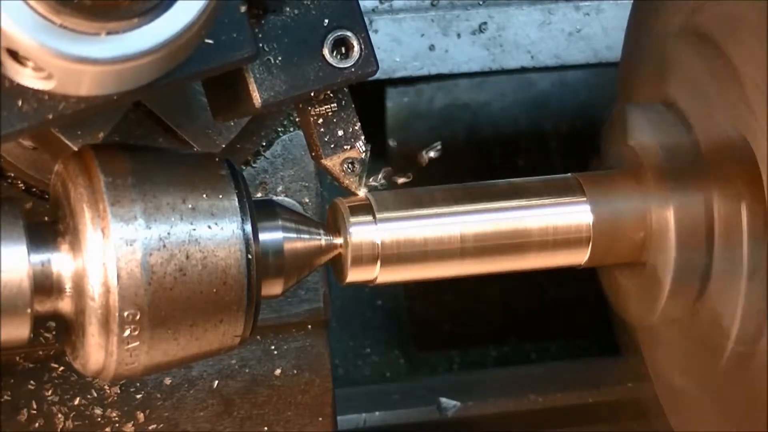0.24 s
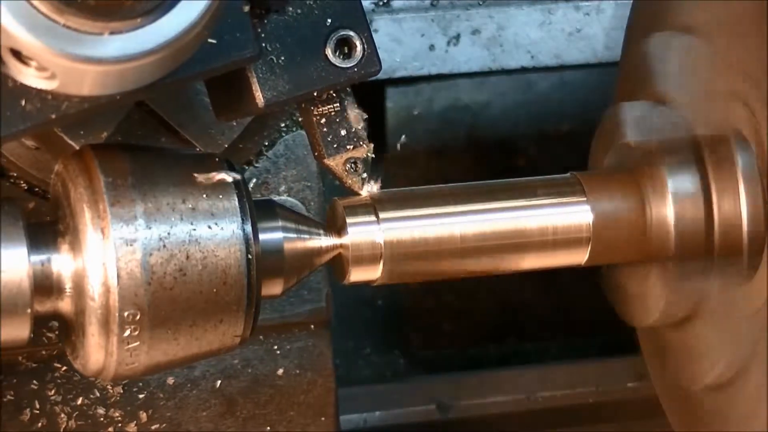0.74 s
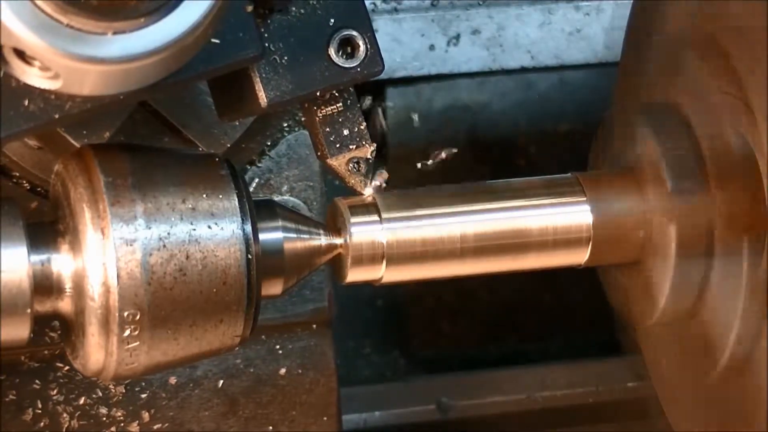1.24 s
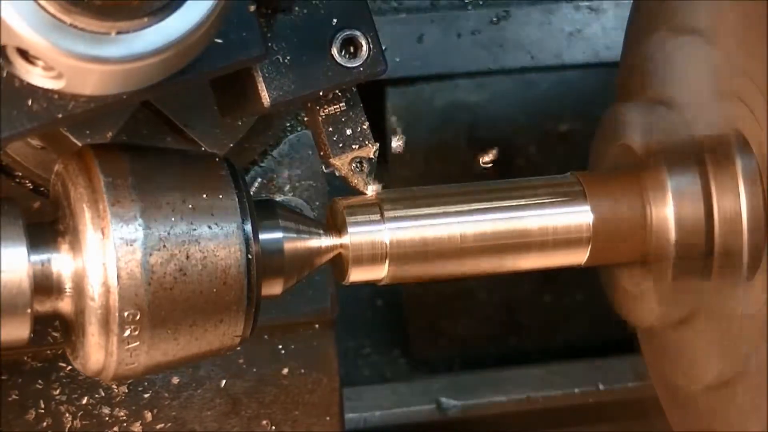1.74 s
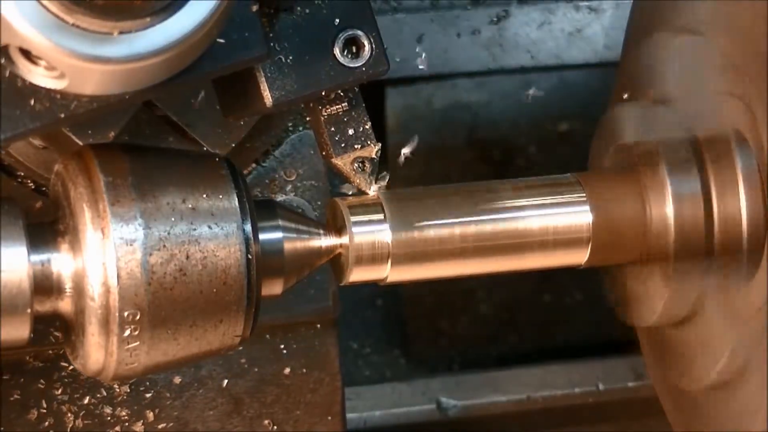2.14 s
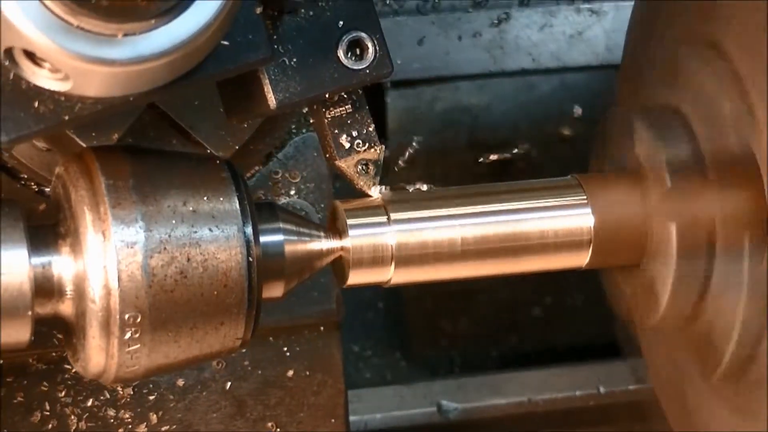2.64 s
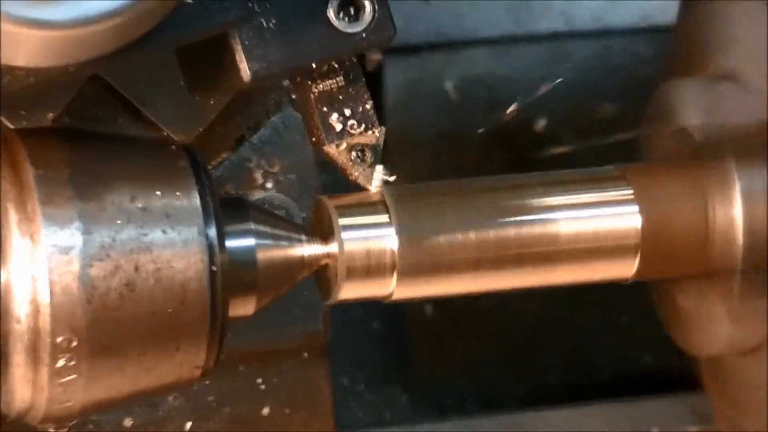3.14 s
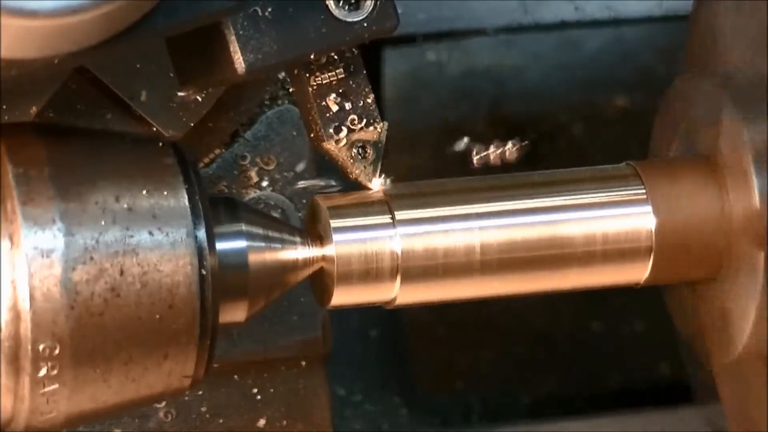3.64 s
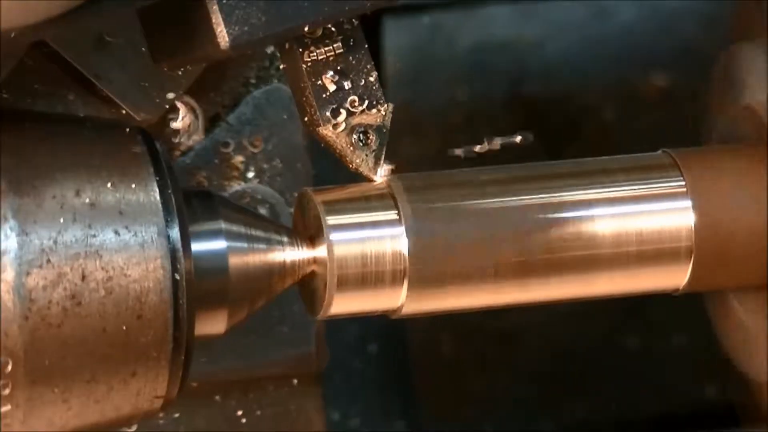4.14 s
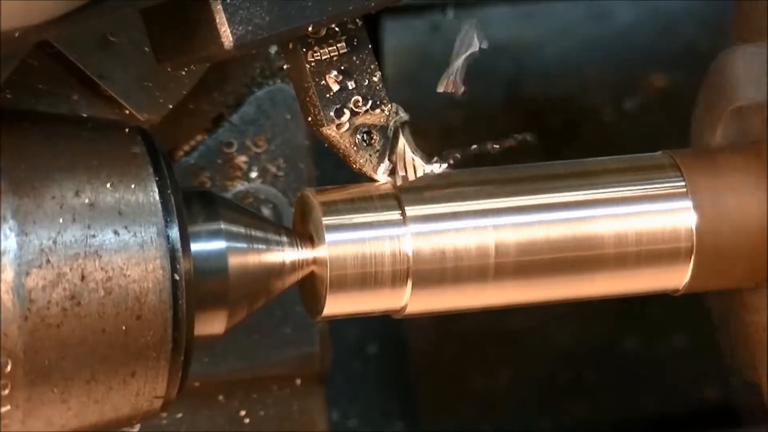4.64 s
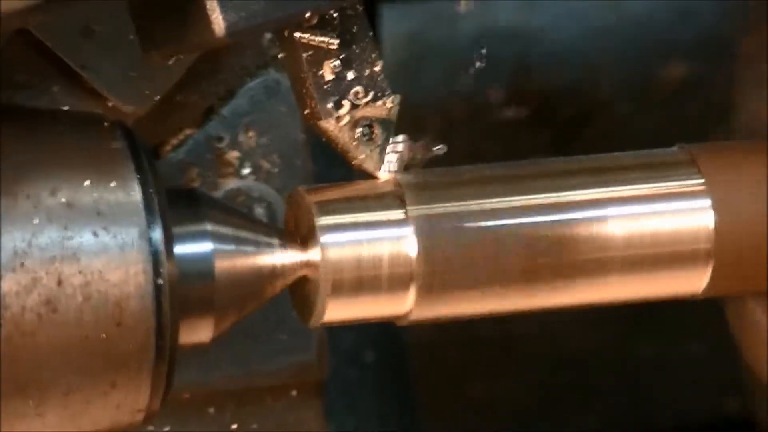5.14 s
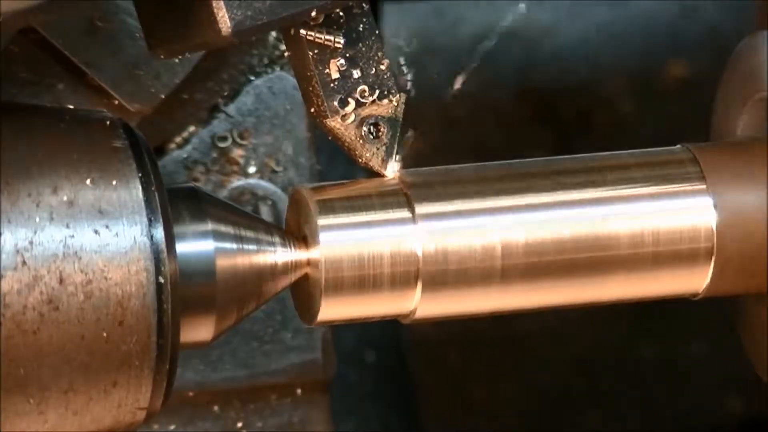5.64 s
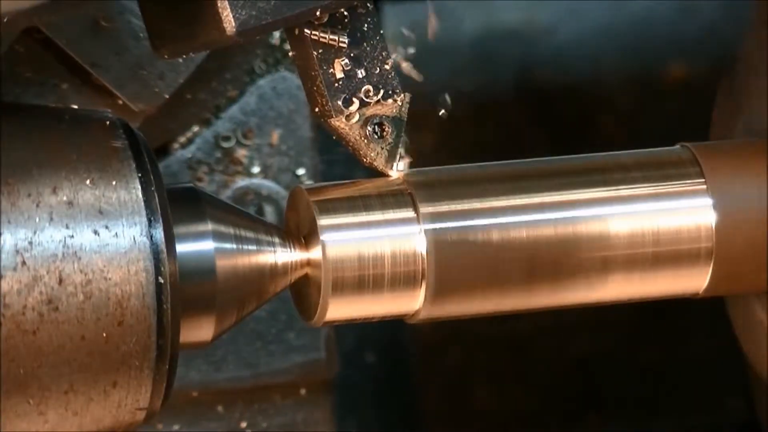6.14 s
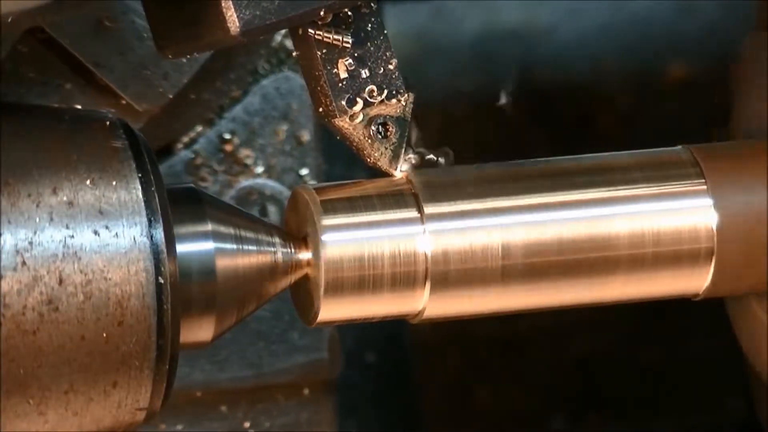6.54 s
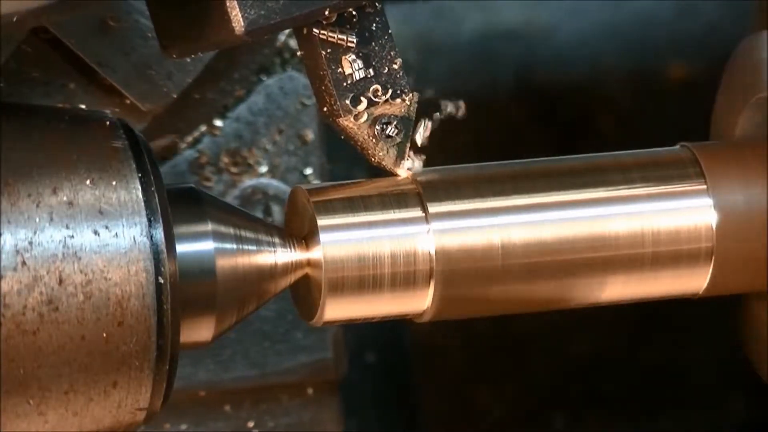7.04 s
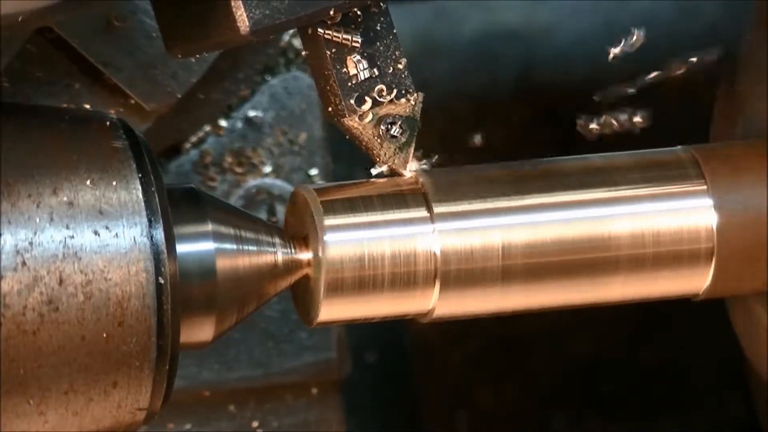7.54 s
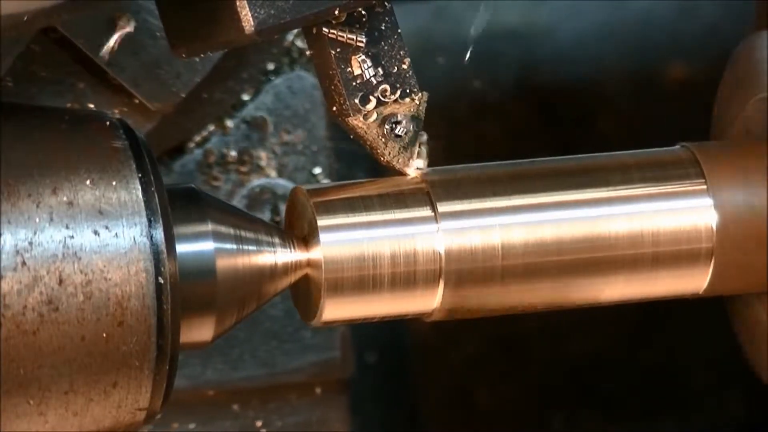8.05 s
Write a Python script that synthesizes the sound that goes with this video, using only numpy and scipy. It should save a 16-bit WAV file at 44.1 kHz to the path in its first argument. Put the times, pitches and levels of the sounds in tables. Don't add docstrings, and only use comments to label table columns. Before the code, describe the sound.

From 0 s a geared lathe is already at full speed, heard very close on a small handheld stereo microphone in a workshop. A bright, gritty rasp of shearing metal dominates and stays almost level, fluttering about eleven times a second with the rotation. Underneath are mains hum and a steady whine of gear tones. Metallic squeals, mid-high to piercing, flicker in bursts of hundredths of a second throughout. A loose jaw knocks softly every turn, sometimes hard, especially from 2 to 5.7 s. Chips tick, spit and snap; the sharpest cracks hit at about 2.2, 2.4 and 2.6 s. Low handling thumps come around 2.4, 3.2, 3.9 and 5.05 s, the last strongest. From 4 to 6 s chip strikes are sparser while cutting continues. Ticks gather again after 6.5 s, with a hard crack near 8.15 s, and the cut is still running at the end, around 8.4 s.

```python
import sys
import numpy as np
from scipy import signal
from scipy.fft import rfft, irfft
from scipy.io import wavfile
from scipy.ndimage import uniform_filter1d

SR = 44100
rng = np.random.default_rng(int(sys.argv[2]) if len(sys.argv) > 2 else 0)


def level_to_linear(level):
    exponent = np.asarray(level, float) / 20
    return 10 ** exponent


def transcribe(signal):
    frames = np.atleast_2d(signal).T
    limited = np.clip(frames, -1, 1)
    pcm = np.round(limited * 32767).astype(np.int16)
    wavfile.write(sys.argv[1], SR, pcm)


N = 365148
T = np.arange(N) / SR
SPINDLE_HZ = 10.944
COUNTERSHAFT_HZ = .4 * SPINDLE_HZ

HUM_DB = [-59, -49, -60]
# [t/s, main gear mesh level/dB, fourth hum multiple level/dB]
DRIVE_LOAD = [(0.0, -40, -44), (0.3, -37, -34.5), (1.2, -36.5, -40), (2.1, -36, -36), (2.6, -37.5, -39),
              (3.0, -36, -37), (4, -37, -37), (5.1, -37, -35.5), (5.8, -35.5, -36), (7.1, -35.7, -40),
              (7.45, -38, -40.5), (8.12, -33.5, -39), (8.28, -38, -41)]
# [multiple of spindle speed, level/dB rms]
GEAR_TONES = [(25, -54), (30, -52), (31, -53), (33, -55), (37, -57), (38, -54), (40, -59), (48, -52),
              (54, -54), (56, -56), (59, -53), (60, -49), (67, -49), (83, -42.5), (90, -41), (91, -42),
              (92, -44), (101, -46), (102, -41), (103, -44), (104, -45), (105, -44), (106, -44), (119, -46),
              (120, -38), (125, -47), (127, -45), (138, -42), (150, -45)]
# [t/s, peak level/dB, f/Hz, t60/s]
HAND_BUMPS = [(2.27, -40, 108, .12), (2.3, -44, 120, .12), (2.409, -32, 120, 0.13), (2.88, -32, 170, .1),
              (3.172, -18, 120, 0.053), (3.2, -29, 115, .16), (3.445, -38, 60, .12), (3.59, -46, 60, .1),
              (4.21, -43, 70, .1), (4.37, -46, 60, .1), (3.88, -45, 130, 0.062), (3.911, -31, 100, 0.09),
              (5.054, -13, 120, 0.043), (5.09, -36, 70, .13)]
# [t/s, rumble level/dB]
GRIP = [
    (0.0, -60),
    (2.1, -59),
    (2.35, -50),
    (2.6, -53),
    (3.05, -57),
    (3.22, -50),
    (3.35, -57),
    (4.05, -57),
    (4.3, -54),
    (8.28, -60),
]
# [t/s, peak level/dB, f/Hz]
JAW_KNOCKS = [(0.2793, -20, 2260), (0.7287, -20, 2330), (0.8255, -21, 2330), (1.0935, -20, 2300),
              (1.4576, -20, 2280), (1.5489, -14, 2200), (2.0996, -13, 2310), (2.1884, -28, 2200),
              (2.2812, -16, 2160), (2.3795, -14, 2180), (2.5626, -15.5, 2180), (2.7362, -20, 2270),
              (2.8285, -13, 2220), (2.9223, -12, 2220), (3.0111, -14, 2250), (3.1946, -19, 2290),
              (3.927, -12, 2340), (4.0143, -13, 2200), (4.1126, -17, 2220), (4.2916, -14, 2130),
              (4.3813, -12, 2260), (4.4727, -18, 2350), (5.023, -12, 2230), (5.2051, -15.5, 2140),
              (5.2979, -18, 2270), (5.474, -12, 2220), (5.6615, -15, 2260), (6.3914, -15, 2250),
              (8.0381, -23, 2210), (8.2187, -15, 2100)]
# [t/s, tick peak level/dB, clack level above the tick/dB, before the clack trim]
CHIP_HITS = [(0.0687, -22.5, 4), (0.3301, -26, 5), (0.7277, -23, 4), (0.9118, -25, 5), (1.4795, -20, 5),
             (2.0083, -27, 4), (2.0224, -17, 2), (2.2837, -21, 7), (2.2962, -26, 4), (2.372, -23, 2),
             (2.3865, -16, 2), (2.4154, -20, 0), (2.5576, -18, 3), (2.6594, -25, -6), (2.7187, -19, 6),
             (3.1093, -22, 7), (3.2056, -26, 5), (3.2824, -17, 7), (3.9285, -23, 7), (6.5041, -27, 7),
             (7.1477, -30.5, 5), (7.4924, -26, 0), (7.5113, -24, 1), (7.6929, -20, -0.5), (7.7638, -24, 4),
             (8.0556, -21, 3), (8.1294, -24, 4), (8.1464, -21, 3)]
# [t/s, peak level/dB]
GUARD_HITS = [
    (2.1905, -9),
    (2.4154, -6.5),
    (2.5755, -8),
    (8.1464, -9),
]
# [t/s, peak level/dB]
SCRAPES = [(0.5048, -32), (1.0051, -33), (1.036, -32), (1.3234, -31), (1.5339, -30), (1.7374, -27),
           (1.9629, -31), (2.0063, -29), (2.1415, -32), (2.382, -26), (2.5586, -28), (2.6594, -30),
           (2.7342, -31), (2.9218, -23), (3.0609, -31), (3.1916, -29), (3.2854, -28), (3.3772, -28),
           (3.5573, -29), (3.5633, -27), (3.7399, -27), (3.7813, -30), (3.9285, -27), (4.0108, -29),
           (4.0741, -30), (4.1116, -29), (4.2053, -28), (4.4313, -32), (4.4697, -31), (4.6478, -31),
           (6.113, -31), (6.2627, -29), (6.3006, -33), (6.5181, -29), (6.7506, -30), (6.8204, -31),
           (6.8488, -29), (6.9366, -29), (7.0289, -32), (7.4934, -28), (7.7643, -28), (7.8575, -32),
           (8.1279, -29)]
# [t/s, peak level/dB]
CHIP_BREAKS = [(0.5646, 0), (0.6485, -5), (0.7282, -9), (0.8255, -6), (1.5304, -8), (1.6087, -7),
               (2.0996, -6), (2.1885, -1), (2.2812, -5), (2.3775, -3), (2.4149, 1), (2.4723, -7),
               (2.6469, -12), (3.021, -3), (3.0689, -6), (3.1955, -9), (3.2804, -6), (3.5808, -9),
               (4.2916, -6), (4.4897, -9), (5.1731, -7), (5.2051, -9), (5.5872, -9), (5.8396, -6),
               (6.1285, -8), (6.3006, -6), (6.4408, -9), (6.5016, -7), (6.5385, -8), (6.6483, -7),
               (6.9072, -8), (7.3253, -7), (7.4155, -8), (7.855, -7), (7.873, -6), (8.0386, -6),
               (8.1464, -5)]
# [f/Hz, width/Hz, steadiness 0-1]
SQUEAL_MODES = [
    (4618, 100, .4),
    (6154, 24, .9),
    (9490, 50, .5),
    (2880, 90, .5),
]
SQUEAL_DB = [-28.5, -33.5, -48, -37]
# [multiple of the countershaft, depth/dB, when/beats]
SQUEAL_BEATS = [
    [(1, 0.95, 0.52), (2.5, 0.37, 0.47), (5, 0.34, 0.52)],
    [(1, 4.1, 0.95), (2, 2, 0.59), (2.5, 1.1, 0.04), (4, 2.6, 0.05), (5, 1, 0.07), (6, 1.3, 0.1)],
    [(1, 2, 0.66), (2.5, 1.8, 0.2), (5, 1.5, 0.1)],
    [(2.5, 1.2, .03)],
]
# [t/s, peak level/dB]
SHANK_BURSTS = [(0.009, -21), (0.039, -24), (0.124, -24), (0.311, -17.5), (0.567, -19.1), (0.648, -27),
                (0.877, -21), (1.028, -22.1), (1.219, -22.4), (1.29, -19), (1.327, -23), (1.457, -19),
                (1.491, -19.5), (1.7, -21), (1.751, -21.7), (1.931, -24), (1.978, -24), (2.124, -22.2),
                (2.193, -19), (2.253, -24), (2.404, -22.0), (2.759, -23), (3.07, -21.4), (3.211, -24),
                (3.282, -19), (3.585, -23), (3.667, -22.0), (3.765, -25), (3.946, -22.3), (4.049, -24),
                (4.308, -21), (4.401, -26), (4.493, -20.0), (4.879, -20), (4.91, -24), (5.133, -29),
                (5.178, -23), (5.415, -24), (5.496, -23), (5.589, -28), (5.77, -22), (5.848, -20.2),
                (6.132, -18.8), (6.317, -21.8), (6.507, -25.5), (6.56, -21), (6.687, -24), (6.731, -22),
                (6.911, -20), (7.327, -20), (7.418, -18.2), (7.451, -30), (7.612, -21), (7.697, -20),
                (7.783, -22), (7.877, -17), (7.92, -22.5), (8.14, -20), (8.175, -20.0), (8.235, -21.8)]
# [t/s, peak level/dB, length/s]
TIP_BURSTS = [(0.218, -26.7, 0.029), (0.397, -25.0, 0.016), (0.459, -26.4, 0.014), (0.523, -25.7, 0.02),
              (0.631, -26.3, 0.021), (0.684, -24.1, 0.015), (0.742, -22.4, 0.027), (1.312, -26.5, 0.015),
              (1.401, -26.5, 0.009), (1.648, -24.0, 0.012), (1.772, -24.5, 0.026), (1.826, -23.4, 0.013),
              (1.997, -25.4, 0.031), (2.054, -24.9, 0.017), (2.222, -23.5, 0.026), (2.286, -26.8, 0.012),
              (2.346, -26.3, 0.014), (2.556, -25.9, 0.032), (2.735, -25.1, 0.02), (2.958, -26.6, 0.016),
              (3.249, -27.6, 0.027), (3.432, -23.8, 0.015), (3.49, -25.6, 0.013), (3.65, -26.4, 0.019),
              (3.837, -23.9, 0.019), (3.935, -24.6, 0.013), (4.038, -27.5, 0.012), (4.115, -27.3, 0.017),
              (4.154, -23.9, 0.024), (4.284, -26.2, 0.02), (4.389, -24.1, 0.01), (4.524, -24.3, 0.014),
              (4.565, -23.6, 0.02), (4.754, -23.9, 0.013), (4.8, -25.3, 0.018), (4.837, -27.0, 0.035),
              (4.96, -24.6, 0.022), (5.024, -22.9, 0.016), (5.073, -21.7, 0.012), (5.213, -26.4, 0.045),
              (5.477, -25.0, 0.02), (5.878, -27.2, 0.012), (5.943, -23.8, 0.021), (5.99, -24.7, 0.015),
              (6.114, -25.5, 0.039), (6.171, -24.0, 0.011), (6.384, -24.6, 0.022), (6.57, -26.8, 0.019),
              (6.787, -24.1, 0.037), (7.03, -22.9, 0.014), (7.134, -21.5, 0.013), (7.251, -27.4, 0.035),
              (7.297, -24.0, 0.016), (7.496, -25.3, 0.022), (7.579, -26.9, 0.034), (7.692, -25.1, 0.012),
              (7.762, -26.1, 0.021), (7.836, -24.4, 0.019), (7.962, -24.1, 0.02), (8.221, -22.3, 0.02)]
# [t/s, peak level/dB]
INSERT_BURSTS = [(0.147, -44.2), (0.434, -43), (1.058, -41.6), (1.344, -42), (1.976, -43.5), (2.145, -43),
                 (2.387, -46), (3.071, -43), (3.14, -41), (3.295, -40), (3.527, -45.1), (3.801, -41),
                 (4.028, -41), (4.213, -38), (4.495, -42.6), (4.931, -40), (5.213, -45.4), (5.428, -45.1),
                 (6.134, -45.3), (6.266, -41.7), (6.523, -37), (6.77, -42.7), (7.037, -46), (7.231, -44.5),
                 (7.688, -42.9), (8.159, -46)]
# [t/s, peak level/dB]
BAR_BURSTS = [(0.164, -19), (0.386, -19), (0.516, -23.4), (0.785, -30), (0.891, -18), (1.09, -22),
              (1.154, -20), (1.201, -29), (1.317, -25.9), (1.534, -26.1), (1.667, -23), (1.762, -18),
              (3.216, -25.8), (3.312, -25.7), (3.431, -23), (3.667, -22), (3.943, -23), (4.085, -28),
              (4.535, -26.8), (4.896, -24), (5.049, -22), (5.617, -21), (5.72, -26.9), (5.768, -24.7),
              (5.846, -24.6), (5.927, -21), (6.223, -27), (6.436, -26.6), (6.509, -24.4), (6.571, -18),
              (6.613, -22), (6.749, -26.7), (6.866, -24), (6.942, -26.3), (7.269, -19), (7.602, -20),
              (7.694, -29), (7.795, -20), (7.849, -20), (8.194, -23)]
BURST_RISE_S = [0.007, 0.006, .018, .014]
BURST_FALL_S = [0.012, 0.02, 0.02, .016]
BURST_TRIM_DB = [1, 0, 1.5, -4]
# [f/Hz, level/dB per Hz]
RASP_SPECTRUM = [(30, -33), (90, -43), (200, -20), (300, -16.5), (500, -12.5), (800, -3), (1000, -2),
                 (3000, -2), (3400, -4), (6000, -2), (7200, -14.5), (10200, -22.5), (13000, -38),
                 (15000, -35.5), (15700, -49)]
# bed, carriage and bar resonances [f/Hz]
BODY_HZ = [265, 345, 410, 510, 660, 905, 1005, 1135, 1203, 1300, 1480, 1565, 1645, 1880, 2097, 2290, 2495,
           2600, 2798, 2900, 3110, 3277, 3607, 3900, 4740, 4960, 5290, 8300, 11150, 12050]
# [width/Hz, level above the rasp/dB]
BODY_SHAPES = [(10, 13.5), (60, 6), (17.6, 4), (60, 7), (60, 2), (13, 7), (70, 4.5), (60, 2.5), (30, 4.5),
               (50, 4), (70, 3.5), (25, 2.5), (50.6, 5.5), (120, 5.5), (40, 5), (80, 3), (20, 5.5), (70, 5),
               (49.3, 4), (88.5, 4.5), (70, 5), (29.6, 7), (49.3, 5), (49, 6), (308, 4), (50, 2.5),
               (21, 6.5), (1170, 6), (494, 6.5), (500, 7)]
# [f/Hz, width/Hz, level/dB]
HOLDER = [(6700, 400, 3), (7230, 200, -3), (7830, 140, -7), (8150, 120, 1.5), (10300, 200, -2),
          (10440, 430, -5), (11300, 100, 2.5), (11600, 200, 4.5), (11900, 150, -8)]
# [f/Hz, swell once a turn/dB, when/turns, swell twice a turn/dB, when/half turns]
RUNOUT = [(566, 0.9, 0.71, 0.5, 0.55), (1010, 1.5, 0.56, 0.9, 0.44), (1549, 0.4, 0.86, 0.1, 0.13),
          (2245, 1.5, 0.02, 1.2, 0.03), (2771, 0.2, 0.24, 0.5, 0.27), (3752, 0.3, 0.24, 0.7, 0.33),
          (4643, 1.0, 0.21, 0.5, 0.34), (5422, 0.5, 0.23, 0.3, 0.19), (6155, 0.8, 0.08, 0.8, 0.07),
          (6641, 0.9, 0.04, 0.7, 0.06), (7937, 0.8, 0.12, 0.3, 0.29), (9498, 0.5, 0.17, 0.6, 0.17),
          (11832, 1.3, 0.06, 0.5, 0.04)]
# [f/Hz, likeness 0-1, left minus right level/dB, left lead/rad]
PORTS = [(100, .35, -4.5, 0), (250, .93, -10.5, .45), (1000, .9, -6.7, .6), (2000, .83, -2.6, .6),
         (4500, .94, 0, .1), (6200, .9, -.5, -.2), (6900, .75, 0, -.5), (7700, .35, -7, -1.2),
         (8300, .42, -12, .5), (9500, .4, -6, .5), (9900, .4, 0, .5), (11300, .72, -.7, 0),
         (12500, .2, -.5, .2), (12900, .22, -.5, 3)]


def evened(x):
    return x / np.sqrt(np.mean(x ** 2) + 1e-20)


def read(points, hz):
    f, *values = np.transpose(points)
    return [np.interp(np.log(hz + 1), np.log(f + 1), v) for v in values]


def follow(rows, t):
    s, *values = np.transpose(rows)
    return [np.interp(t, s, v) for v in values]


def cycle(turns):
    return np.cos(2 * np.pi * turns)


def wander(rate_hz):
    r = np.exp(-2 * np.pi * rate_hz / SR)
    return evened(signal.lfilter([1], [1, -2 * r, r * r], rng.standard_normal(N + SR))[SR:])


def add(mix, s, sound):
    part = mix[..., round(s * SR):][..., :sound.shape[-1]]
    part += sound[..., :part.shape[-1]]


def band(x, lo_hz, hi_hz):
    return signal.sosfilt(signal.butter(3, [lo_hz, hi_hz], "band", fs=SR, output="sos"), x)


def crack(t60):
    burst = rng.standard_normal((2, 600)) * level_to_linear(-60 * np.arange(600) / SR / t60)
    return burst / abs(burst).max(axis=1, keepdims=True)


def burst_shape(rows, rise_s, fall_s):
    out = np.zeros(N)
    for s, db, *length in rows:
        near = slice(max(round((s - .2) * SR), 0), round((s + .2) * SR))
        late = T[near] - s
        after_s = 1.2 * length[0] if length else fall_s
        out[near] += level_to_linear(db) * np.exp(-(late / np.where(late < 0, rise_s, after_s)) ** 2)
    return out


def motor():
    swell_db = follow(DRIVE_LOAD, T)[1] + 0.7 * wander(12.0) + 1.3 * cycle(SPINDLE_HZ * T - .74)
    out = np.zeros(N)
    for k, db in enumerate(HUM_DB + [swell_db]):
        out += level_to_linear(db + 2.5) * np.sin(2 * np.pi * ((k + 1) * 120.02 * T + rng.random()))
    return out


def gears():
    turns = SPINDLE_HZ * T + 0.00054 * wander(2.1)
    drift = [wander(5.7) for _ in range(4)]
    mesh_db = follow(DRIVE_LOAD, T)[0] + 4.5 + 1.2 * cycle(7.4 * T - 0.52)
    out = level_to_linear(mesh_db) * np.sin(2 * np.pi * 24 * turns)
    for k, (multiple, db) in enumerate(GEAR_TONES):
        level = level_to_linear(db + 2.5 + 2.4 * drift[k % 4])
        out += level * np.sin(2 * np.pi * (multiple * turns + rng.random()))
    return out


def handling():
    out, t = np.zeros((2, N)), np.arange(6000) / SR
    trim_db = -7.0
    for s, db, hz, t60 in HAND_BUMPS:
        sag = hz * (t + 0.0041 * (1 - np.exp(-t / 0.0041)))
        level = level_to_linear(db + trim_db - 60 * t / t60) * (1 - np.exp(-t / 0.00085))
        add(out, s, level * np.sin(2 * np.pi * sag) * [[1], [.8]])
    rumble = evened(band(rng.standard_normal((2, N)), 48, 264))
    return out + level_to_linear(follow(GRIP, T)[0] + trim_db + 5 * wander(7.9)) * rumble


def knocks():
    out, t = np.zeros(N), np.arange(1500) / SR
    soft = [(k / SPINDLE_HZ - .004, -26, 2250) for k in range(1, int(N / SR * SPINDLE_HZ))]
    for s, db, hz in soft + JAW_KNOCKS:
        level = level_to_linear(db - 60 * t / .06) * (1 - np.exp(-t / .002))
        add(out, s, level * np.sin(2 * np.pi * hz * t))
    return out


def chips():
    tick, clack = np.zeros((2, N)), np.zeros((2, N))
    scatter = [(s * N / SR, -34 + 3.5 * u ** 2, 4.0) for s, u in rng.random((250, 2))]
    shaken = [(s, db - 13, 4.0) for s, db, _ in JAW_KNOCKS]
    for s, db, clack_db in CHIP_HITS + scatter + shaken:
        burst = level_to_linear(db) * crack(t60=.012)
        add(tick, s, burst)
        add(clack, s, burst * level_to_linear(clack_db - 23))
    for s, db in GUARD_HITS:
        add(clack, s, level_to_linear(db + 8) * crack(t60=.01))
    bright = level_to_linear(6) * band(tick, 6800, 10500)
    airy = level_to_linear(-8) * band(tick, 10500, 13000)
    return bright + airy + band(clack, 1200, 6500)


def spits():
    out = np.zeros((2, N))
    for s, db in SCRAPES:
        add(out, s, level_to_linear(db + 3.5) * crack(t60=.03))
    return band(out, 7500, 13000)


def snaps():
    out = np.zeros((2, N))
    for s, db in CHIP_BREAKS:
        add(out, s, level_to_linear(db - 2) * crack(t60=.02))
    return band(out, 1000, 6500)


def squeals():
    out = np.zeros((2, N))
    for k, rows in enumerate([SHANK_BURSTS, TIP_BURSTS, INSERT_BURSTS, BAR_BURSTS]):
        hz, width, steady = SQUEAL_MODES[k]
        r = np.exp(-np.pi * width / SR)
        noise = rng.standard_normal((2, N, 2)) @ [1, 1j]
        z = signal.lfilter([1], [1, -2 * r ** 1.5, r ** 3], noise)
        z = z / (abs(z) + 1e-9) ** steady
        ring = evened((z * np.exp(2j * np.pi * hz * T)).real)
        beat_db = sum(depth_db * np.cos(2 * np.pi * (m * COUNTERSHAFT_HZ * T - at))
                      for m, depth_db, at in SQUEAL_BEATS[k])
        bursts = level_to_linear(BURST_TRIM_DB[k]) * burst_shape(rows, BURST_RISE_S[k], BURST_FALL_S[k])
        out += np.hypot(level_to_linear(SQUEAL_DB[k] + beat_db), bursts) * ring
    return out


def rasp_motion(t, hz):
    frames, pitch = len(t), hz[:, None]
    once_db, once_at, twice_db, twice_at = (v[:, None] for v in read(RUNOUT, hz))
    turn = SPINDLE_HZ * t
    swell_db = once_db * cycle(turn - once_at) + twice_db * cycle(2 * turn - twice_at)
    patches = uniform_filter1d(rng.standard_normal((len(hz), frames)), size=5, axis=0)
    patches = evened(uniform_filter1d(patches, size=30, axis=1))
    flicker = evened(uniform_filter1d(rng.standard_normal(frames), size=8))
    field_db = 0.81 * swell_db + 0.37 * patches + 1.14 * np.clip(pitch / 9000, 0, 1) * flicker
    crackle = evened(uniform_filter1d(rng.exponential(1, frames) ** 2, size=3) - 2)
    field_db += .7 * np.clip(pitch / 3000, 0, 1.4) * np.minimum(crackle, 4)
    bar_db = 1.5 * cycle(0.364 * t - 0.31) + 1.5 * np.interp(t, T, wander(3.9))
    return field_db + 0.73 * np.exp(-((pitch - 2850) / 220) ** 2) * (bar_db - bar_db.mean())


def rasp():
    hop, size = 64, 256
    hz = np.fft.rfftfreq(size, 1 / SR)
    t = np.arange(N // hop + 6) * hop / SR
    grains = rng.standard_normal((2, len(hz), len(t), 2)) @ [1, 1j]
    moving = grains * level_to_linear(rasp_motion(t, hz))
    white = signal.istft(moving, nperseg=size, noverlap=size - hop)[1][:, :N]
    f = np.fft.rfftfreq(N, 1 / SR)
    rings = np.ones(len(f))
    for m, (w, db) in zip(BODY_HZ, BODY_SHAPES):
        rings += (level_to_linear(2 * db) - 1) / (1 + (2 * (f - m) / w) ** 4)
    for m, w, db in HOLDER:
        rings *= level_to_linear(2 * db / (1 + (2 * (f - m) / w) ** 2))
    cut = evened(irfft(rfft(white) * level_to_linear(read(RASP_SPECTRUM, f)[0]) * np.sqrt(rings), N))
    return level_to_linear(-18 - 0.13 * wander(2.3)) * cut


def ports(direct, diffuse):
    same, tilt_db, lead = read(PORTS, np.fft.rfftfreq(N, 1 / SR))
    same = np.clip(same, 0, 1)
    left = level_to_linear(tilt_db) * np.exp(1j * lead)
    apart = np.sqrt(1 - same ** 2)
    centre = np.sqrt(abs(1 + left * same) ** 2 + abs(left * apart) ** 2) / 2
    a, b = rfft(direct) / centre, rfft(diffuse) / centre
    return irfft(np.array([left * (same * a + apart * b), a]), N)


def scene():
    direct, diffuse = handling() + chips() + spits() + snaps() + squeals() + rasp()
    return ports(motor() + gears() + knocks() + direct, diffuse)


def band_limit(x):
    return signal.sosfilt(signal.butter(12, 15700, fs=SR, output="sos"), x)


def record(dry):
    peak_db = 20 * np.log10(abs(dry).max(0) + 1e-6)
    fall_db = T * 45.
    held_db = np.maximum.accumulate(peak_db + fall_db) - fall_db
    over_db = np.maximum(held_db + 3.5, 0)
    duck_db = signal.lfilter([.015], [1, -.985], over_db)
    return band_limit(dry / level_to_linear(duck_db))


dry = scene()
out = record(dry)
transcribe(out)
```